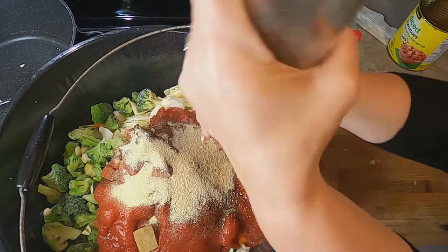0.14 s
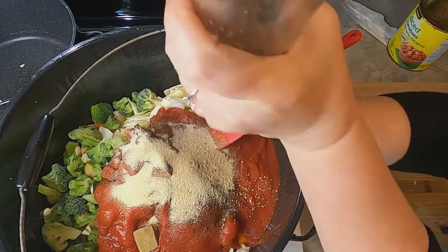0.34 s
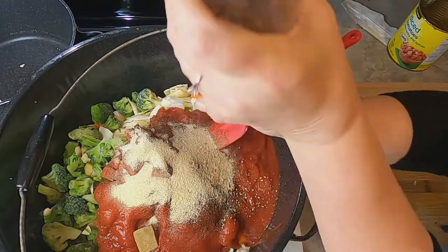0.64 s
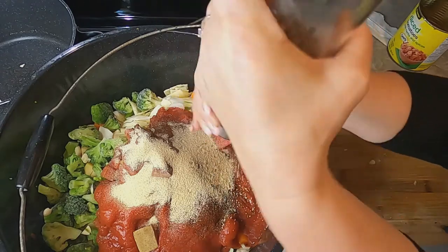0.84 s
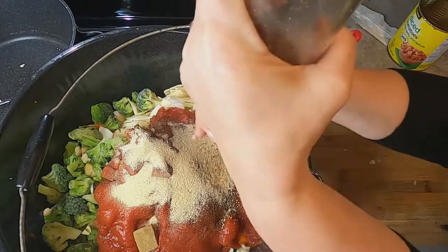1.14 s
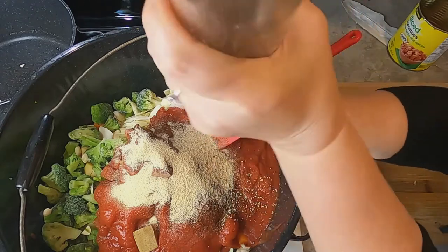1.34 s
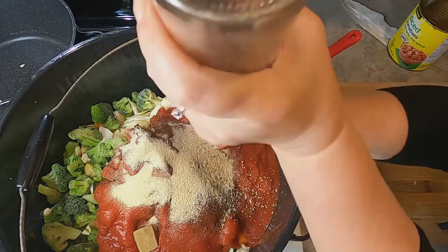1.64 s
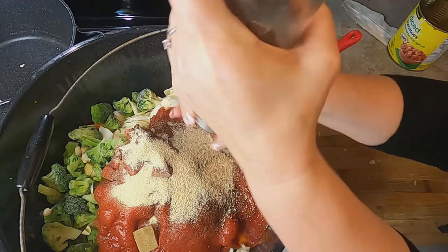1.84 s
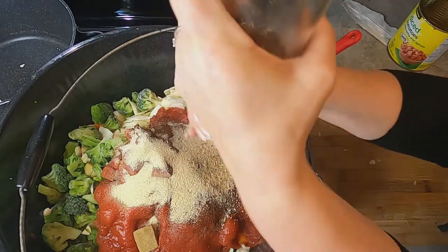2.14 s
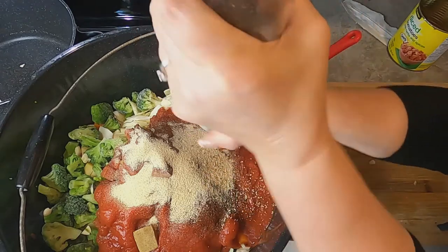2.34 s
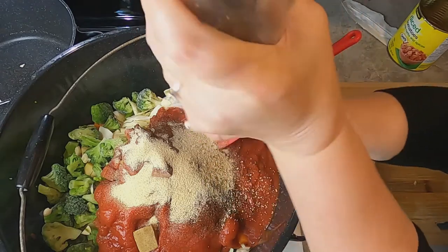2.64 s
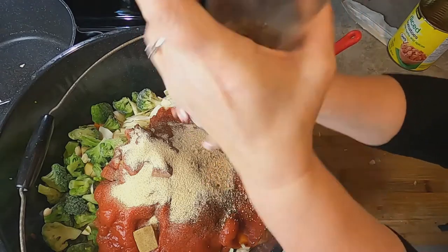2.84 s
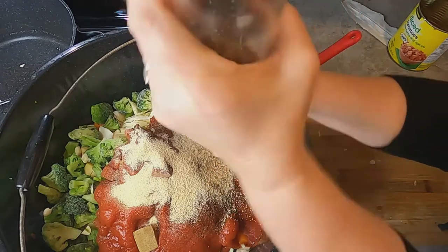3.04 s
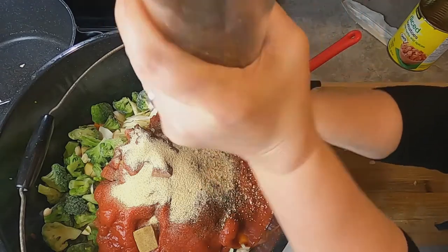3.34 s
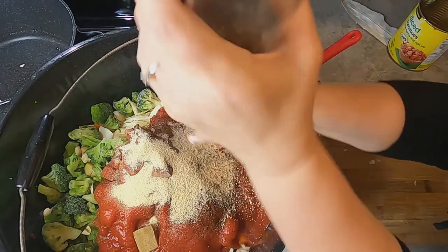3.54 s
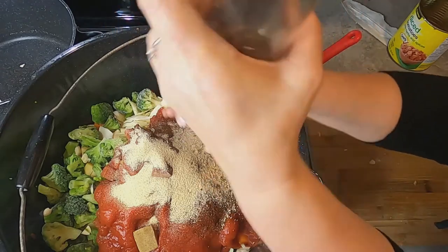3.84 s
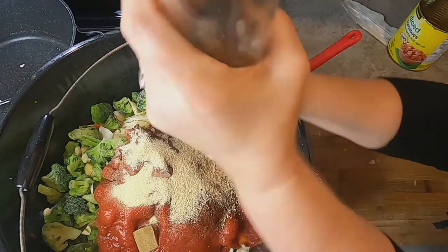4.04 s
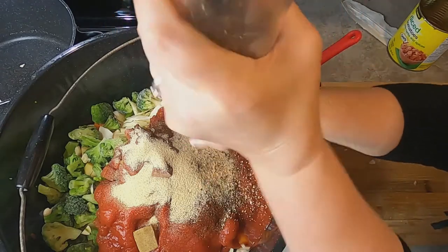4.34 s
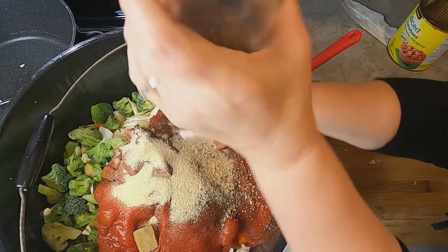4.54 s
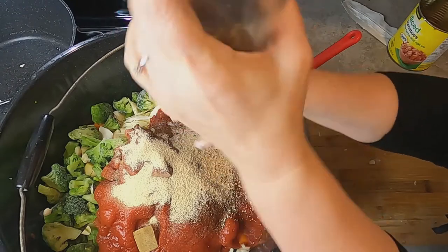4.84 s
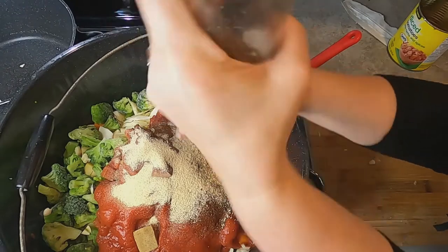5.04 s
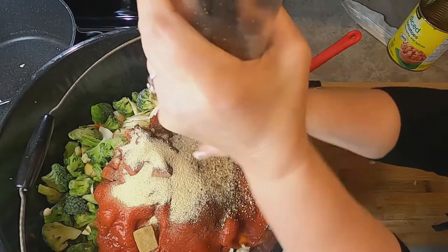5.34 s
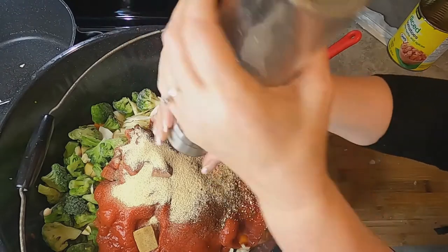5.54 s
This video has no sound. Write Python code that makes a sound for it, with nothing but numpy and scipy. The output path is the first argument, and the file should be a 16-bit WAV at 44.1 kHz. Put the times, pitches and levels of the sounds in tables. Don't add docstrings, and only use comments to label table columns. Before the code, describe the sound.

Close, steady twists of a glass-jarred pepper grinder: gritty crunch, sharp little cracks, then loose corns rattling, over faint kitchen room hiss.

```python
import sys
import numpy as np
from scipy import signal
from scipy.fft import rfft, irfft, next_fast_len
from scipy.io import wavfile

SR = 44100
rng = np.random.default_rng(int(sys.argv[2]) if len(sys.argv) > 2 else 0)


def file_out(sig):
    cols = np.atleast_2d(sig).T
    lim = np.clip(cols, -1, 1)
    pcm = np.round(lim * 32767).astype(np.int16)
    wavfile.write(sys.argv[1], SR, pcm)


def to_linear_factor(level_db):
    exponent = np.asarray(level_db, float) / 20
    return 10 ** exponent


N = 251017
COARSE = np.arange(0, N, 64)
LEFT_RIGHT = np.array([[1], [-1]])


def rms_one(x):
    return x / np.sqrt(np.mean(x ** 2) + 1e-20)


def every_sample(coarse):
    return np.interp(np.arange(N), COARSE, coarse)


def in_time(rows):
    s, *columns = np.transpose(rows)
    return [np.interp(np.arange(N) / SR, s, c) for c in columns]


def at_hz(points, hz):
    table_hz, values = np.transpose(points)
    return np.interp(np.log(hz), np.log(np.maximum(table_hz, 1)), values)


def band_share(hz, low_hz, high_hz):
    return np.clip(np.log(hz / low_hz) / np.log(high_hz / low_hz), 0, 1)


def shaped(x, gain_of_hz):
    size = next_fast_len(N + SR // 2)
    hz = np.arange(size // 2 + 1) * SR / size + 1e-3
    return irfft(rfft(x, size) * gain_of_hz(hz), size)[..., :N]


def resonate(x, hz, width_hz):
    r = np.exp(-np.pi * width_hz / SR)
    b = np.array([1, 0, -1]) * (1 - r * r) / 2
    return signal.lfilter(b, [1, -2 * r * np.cos(2 * np.pi * hz / SR), r * r], x)


def drift(rate_hz):
    r = np.exp(-40 * np.pi * rate_hz / SR)
    noise = rng.standard_normal(N // 20 + 2002)
    slow = signal.lfilter([1], [1, -2 * r, r * r], noise)[2000:]
    return np.interp(np.arange(N) / 20, np.arange(len(slow)), rms_one(slow))


def grains(per_s, spread_db):
    born = rng.random(N) < per_s / SR
    sizes = to_linear_factor(spread_db * np.minimum(rng.exponential(1, N), 4)) * rng.choice([-1, 1], N)
    return rms_one(born * sizes + 1e-18)


def swells(rows, rise_db_per_s, fall_db_per_s, rest_db):
    age = COARSE[None] / SR - np.array(rows)[:, :1]
    db = np.array(rows)[:, 1:] + np.where(age < 0, rise_db_per_s * age, -fall_db_per_s * age)
    return every_sample(10 * np.log10(np.sum(to_linear_factor(2 * db), axis=0) + to_linear_factor(2 * rest_db)))


# f/Hz, level/dB per Hz
AIR_SPECTRUM = [(180, -63), (300, -9.5), (1070, -21), (2070, -14), (2690, -3), (3810, -26.5), (5950, -15.5),
                (12300, -29), (15500, -40)]
AIR_DB = -54.5


def air():
    hiss = shaped(rng.standard_normal((2, N)), lambda hz: to_linear_factor(at_hz(AIR_SPECTRUM, hz)))
    return to_linear_factor(AIR_DB - 6.5) * rms_one(hiss)


# t/s, level/dB
LEANS = [
    (0.0, -59),
    (.87, -68),
    (1.16, -61),
    (1.5, -52.5),
    (1.82, -62),
    (2.46, -65),
    (3.14, -49.5),
]
DRONE_HZ, DRONE_WIDTH_HZ, DRONE_REST_DB = 166, 60, -68.5


def drone():
    mid, side = rng.standard_normal((2, N))
    hum = mid + .6 * side * LEFT_RIGHT
    for _ in range(2):
        hum = resonate(hum, DRONE_HZ, DRONE_WIDTH_HZ)
    return to_linear_factor(swells(LEANS, 184, 148.5, DRONE_REST_DB)) * rms_one(hum)


# t/s, level/dB
ARM_MOVES = [
    (.4, -75),
    (1.1, -69),
    (2.0, -59.5),
    (2.85, -61.5),
    (3.41, -65),
    (3.82, -57),
    (4.63, -61),
    (5.05, -59),
]
ARM_REST_DB = -69.5


def arm_rumble():
    band = signal.butter(3, [14, 45], "band", fs=SR, output="sos")
    mid, side = signal.sosfilt(band, rng.standard_normal((2, N)))
    rumble = rms_one(mid * to_linear_factor(1.4 * LEFT_RIGHT) + 0.45 * side * LEFT_RIGHT)
    return to_linear_factor(swells(ARM_MOVES, 58, 39.5, ARM_REST_DB)) * rumble


KITCHEN_T60_S, KITCHEN_DB, WALL_CUT_HZ = 0.28, -13, 10000


def kitchen(x):
    age = np.arange(SR // 2) / SR
    both, apart = rng.standard_normal((2, len(age)))
    apart = signal.lfilter(*signal.butter(1, 1200, "high", fs=SR), apart)
    onset = np.minimum(age / .003, 1)
    decay = to_linear_factor(-60 * age / KITCHEN_T60_S) * onset * (1 + 0.53 * np.exp(-age / 0.0059))
    tails = np.array([both + apart, both - apart]) * decay
    tails = signal.lfilter(*signal.butter(1, WALL_CUT_HZ, fs=SR), tails)
    tails = tails / np.sqrt(np.mean(np.sum(tails ** 2, axis=1)))
    return to_linear_factor(KITCHEN_DB) * signal.fftconvolve(x[None], tails, axes=1)[:, :N]


# t/s, peak/dB
THUDS = [
    (0.87, -57),
    (1.46, -56),
    (2.821, -65),
    (3.097, -62),
    (4.141, -67),
]
THUD_HZ, THUD_WIDTH_HZ = 84, 25


def thuds():
    push = np.full(N, 1e-18)
    for s, peak_db in THUDS:
        push[round(s * SR)] = to_linear_factor(peak_db + 56.5)
    return resonate(resonate(push, THUD_HZ, THUD_WIDTH_HZ), THUD_HZ, 8.4 * THUD_WIDTH_HZ)


STILL_DB, STILL_LEAD_MS, STILL_MS = -4.5, 18, 20


def stillness():
    gaps = (COARSE / SR - np.array(TWISTS)[:, :1] + STILL_LEAD_MS / 1000) / (STILL_MS / 1000)
    return every_sample(STILL_DB * np.exp(-gaps ** 2).sum(axis=0))


# t/s, level/dB, f/Hz
RATTLE = [(0.0, -45, 2630), (0.16, -52.5, 2660), (0.33, -48, 2550), (0.58, -55.5, 2600),
          (0.92, -48.5, 2710), (1.08, -56, 2440), (1.5, -59.5, 2760), (1.75, -48, 2680),
          (1.93, -49.5, 2620), (2.15, -63, 2670), (2.97, -53.5, 2670), (3.27, -55.5, 2600),
          (3.82, -59.5, 2720), (4.25, -54.5, 2730), (4.75, -47, 2640), (5.26, -52, 2680), (5.52, -60, 2600),
          (5.6, -91, 2920)]
UPPER_DB, UPPER_FOLLOWS, UPPER_DAMPED = -57.5, 0.37, 0.059
WAVER_HZ = 46


def jar_shaking(crush_db):
    shake_db, ring_hz = in_time(RATTLE)
    still_db = stillness()
    ring_hz = ring_hz + WAVER_HZ * drift(5.2)
    upper_db = UPPER_DB + UPPER_FOLLOWS * (shake_db - shake_db.mean())
    upper_db = upper_db - UPPER_DAMPED * (crush_db - crush_db.mean())
    return shake_db + still_db, ring_hz, upper_db + still_db


# f/Hz, width/Hz, level/dB
JAR_RINGS = [(5310, 400, -12), (5910, 180, -11), (6990, 330, -18.5), (9250, 420, -24.5), (12100, 970, -29)]
JAR_MAIN_HZ = [2400, 2520, 2640, 2760, 2880]
JAR_MAIN_WIDTH_HZ = 105


def jar(main_db, main_hz, upper_db):
    taps = grains(1400 * to_linear_factor(4.0 * drift(25)), spread_db=3.0)
    upper = np.zeros((2, N))
    for hz, width_hz, db in JAR_RINGS:
        strikes = taps * rng.standard_normal((2, N))
        upper += to_linear_factor(db + 3.9 * drift(8.1)) * resonate(strikes, hz, width_hz)
    upper = upper[0] + .5 * upper[1] * LEFT_RIGHT
    main = np.zeros(N)
    for hz in JAR_MAIN_HZ:
        nearness = np.exp(-((main_hz - hz) / 130) ** 2)
        main += resonate(taps * rng.standard_normal(N) * nearness, hz, JAR_MAIN_WIDTH_HZ)
    main_gain = to_linear_factor(main_db - 2.0 + 2.1 * drift(8.9))
    return main_gain * rms_one(main) + to_linear_factor(upper_db + 0.5) * rms_one(upper)


# t/s, length/ms, level/dB
DRAGS = [(1.456, 34, -46.5), (2.084, 49, -54), (2.415, 48, -58.5), (2.758, 38, -46.5), (3.435, 44, -53.5),
         (3.76, 20, -47), (4.086, 55, -58), (4.436, 21, -54), (4.737, 60, -54), (5.056, 47, -60),
         (5.42, 28, -55)]
# f/Hz, width/Hz, level/dB
HOLLOW_RINGS = [(1072, 109, 0), (1497, 23, -4.5)]
DRAG_ONSET_DB_PER_S, RELEASE_DB_PER_S = 3000, 368


def scrape():
    s, length_ms, db = np.transpose(DRAGS)[:, :, None]
    age = COARSE / SR - s
    drag_db = db + DRAG_ONSET_DB_PER_S * np.minimum(age, 0)
    drag_db = drag_db - RELEASE_DB_PER_S * np.maximum(age - length_ms / 1000, 0)
    slips = grains(900, spread_db=4.0)
    rings = sum(to_linear_factor(ring_db) * resonate(slips, hz, 1.2 * width_hz) for hz, width_hz, ring_db in HOLLOW_RINGS)
    return every_sample(to_linear_factor(drag_db).sum(axis=0)) * rms_one(rings)


# t/s, peak/dB, lows/dB, highs/dB, length/ms
CRACKS = [(0.176, -21, -3, -15, 1.66), (0.1899, -19.5, -10, -10.5, 2.2), (0.5171, -18.5, -8.5, -8.5, 1.9),
          (0.86, -14, -9.5, -11.5, 2.9), (1.147, -11.5, -3.5, -7, 1.77), (1.1696, -16.5, -5, -16, 2.3),
          (1.552, -16, 1, -12, 1.3), (1.8427, -16, -5.5, -33, 3.7), (1.8784, -10.5, -14.5, -14.5, 2),
          (2.1334, -14.5, -8.5, -12.5, 1.44), (2.1636, -21.5, -6.5, -13, 3.7),
          (2.188, -19.5, -10, -36, 2.5), (2.4755, -21.5, -4, -5, 6.8), (2.501, -19, -21, -20, 2.2),
          (2.804, -16.5, -11, -14.5, 3.7), (3.1193, -14.5, -5, -4.5, 1.5), (3.1432, -14.5, -5, -15, 0.96),
          (3.477, -20, -3, -9.5, 1.5), (3.7889, -7.5, -9, -8, 0.82), (4.144, -12, -8, -4.5, 0.82),
          (4.4569, -11.5, -20.5, -22, 0.97), (4.4848, -17, -32, -47, 2.6), (4.818, -16.5, -30, -46, 1.6),
          (4.8278, -16, -25, -20.5, 1.86)]
# t/s, peak/dB, highs/dB
CATCHES = [(0.4767, -28.5, -3.5), (0.6456, -35.5, -30), (0.8231, -28.5, -2.5), (0.8967, -23.5, -30),
           (0.976, -30.5, -16), (1.1274, -38, -11), (1.279, -54, 5), (1.389, -58, 0), (1.4573, -45, -3),
           (1.477, -32.5, -19), (1.491, -23.5, -33), (1.7967, -25.5, -4), (2.116, -38, -30),
           (2.444, -32.5, -24), (2.7612, -40.5, -6), (3.0294, -37, -20), (3.105, -30.5, -2),
           (3.4454, -41, -13), (3.4587, -36.5, -28), (3.7101, -38, -26), (3.7629, -40, -16),
           (4.131, -27.5, -18), (4.7553, -36.5, -9), (5.0548, -49, -22), (5.126, -34, -11),
           (5.191, -30.5, -15), (5.3193, -43, -22), (5.443, -38.5, -19), (5.467, -33, -23),
           (5.6199, -48, -5)]
CATCH_LOWS_DB, CATCH_MS = 2.5, 1.25
# t/s, peak/dB, highs/dB
TICKS = [(0.2813, -33, -9), (0.2977, -34.5, -10), (0.6355, -46, 6), (0.672, -40.5, -3),
         (0.7037, -38.5, -26), (0.845, -18.5, -27), (1.0274, -53, -14), (1.331, -58, 17),
         (1.51, -17.5, -19), (1.6903, -31, -33), (2.0155, -33, -11), (2.332, -45, -13), (2.4677, -25, -29),
         (2.6624, -35, -10), (2.7806, -28, -21), (2.9084, -42, 3.5), (3.342, -31.5, -19), (3.855, -21, -25),
         (4.038, -37.5, -5), (4.1061, -24.5, -23), (4.346, -34, -10), (4.4368, -35, -24.5),
         (4.6, -33.5, -3), (4.675, -30, -21), (4.93, -44, -1), (5.044, -49, 14), (5.1044, -31.5, -22),
         (5.2728, -38, 4), (5.334, -30, -10.5), (5.524, -22.5, -39.5)]
TICK_LOWS_DB, TICK_MS = -18.5, 1.42
SHARDS_DB, SHARDS_MS = -17.5, 16


def crack_bursts():
    burst, lows_db, highs_db = np.zeros((3, N))
    age = np.arange(round(.03 * SR)) / SR
    blows = list(CRACKS)
    blows += [(s, db, CATCH_LOWS_DB, high, CATCH_MS) for s, db, high in CATCHES]
    blows += [(s, db, TICK_LOWS_DB, high, TICK_MS) for s, db, high in TICKS]
    shards = to_linear_factor(SHARDS_DB) * np.exp(-age * 1000 / SHARDS_MS)
    for s, peak_db, low_db, high_db, length_ms in blows:
        at = round(s * SR) + np.arange(len(age))
        split = np.exp(-age / np.clip(length_ms / 1000, 2e-4, .008))
        shape = to_linear_factor(peak_db) * np.minimum(age / 0.00043, 1) * (split + shards)
        louder = shape > burst[at]
        burst[at[louder]] = shape[louder]
        lows_db[at[louder]], highs_db[at[louder]] = low_db, high_db
    return burst, lows_db, highs_db


def knocks(burst, lows_db, highs_db):
    shake = burst * rng.standard_normal(N) + 1e-18
    jolt = np.maximum(np.diff(burst, prepend=0), 0)
    drive = (jolt * to_linear_factor(11.5) + shake) * to_linear_factor(lows_db)
    body = sum(to_linear_factor(db) * resonate(drive, hz, width_hz) for hz, width_hz, db in HOLLOW_RINGS)
    glass = sum(to_linear_factor(db) * resonate(shake * to_linear_factor(highs_db), hz, width_hz) for hz, width_hz, db in JAR_RINGS)
    main = sum(resonate(shake, hz, JAR_MAIN_WIDTH_HZ) for hz in JAR_MAIN_HZ[1::2])
    return to_linear_factor(20.0) * body + to_linear_factor(16) * glass + to_linear_factor(5.0) * main


# bite t/s, rise/ms, hold/ms, crush/dB, highs against lows/dB
TWISTS = [(-.17, 39, 38, -28, -8), (0.159, 50.7, 30, -33.5, -1), (0.476, 29, 50, -32, -6.5),
          (0.81, 46.3, 27.4, -23.5, -11.5), (1.13, 35, 58.6, -30, -7.5), (1.452, 45, 61, -27.5, -13.5),
          (1.778, 41, 53, -33, -2.5), (2.099, 31.3, 70, -36.5, -2), (2.427, 56, 29, -31.5, -4.5),
          (2.758, 38.4, 60.4, -31, -7), (3.093, 34.6, 43.4, -28.5, -4), (3.438, 45.5, 22.4, -30.5, -3.5),
          (3.754, 59, 52, -36, -1.5), (4.092, 57, 21, -33, -1), (4.432, 38, 62, -34.5, -6),
          (4.737, 81.4, 18, -33.5, -7), (5.082, 58, 42, -33.5, -3.5), (5.412, 50, 60, -37.5, -7.5)]
BITE_DB, SAG_DB_PER_S = -58, 31
SETTLE_DB, SETTLE_DB_PER_S, SETTLE_HIGHS_DB = -22, 86, -0.5
REST_DB = -74
HIGHS_CLIMB = 0.87
HIGHS_CLIMB_NOTE = None


def twisting():
    t = COARSE / SR
    s, rise_ms, hold_ms, db, highs_db = np.transpose(TWISTS)[:, :, None]
    full = s + rise_ms / 1000
    held = np.maximum(t - full, 0)
    released = np.maximum(t - full - hold_ms / 1000, 0)
    rising = (db - BITE_DB) * np.minimum(t - full, 0) / (full - s)
    crush = db + rising - SAG_DB_PER_S * held - RELEASE_DB_PER_S * released
    settle = db + rising + SETTLE_DB - SETTLE_DB_PER_S * released
    lows = np.sum(to_linear_factor(2 * crush) + to_linear_factor(2 * settle), axis=0) + to_linear_factor(2 * REST_DB)
    bright = to_linear_factor(2 * (crush + highs_db)) + to_linear_factor(2 * (settle + SETTLE_HIGHS_DB))
    highs = np.sum(to_linear_factor(2 * (HIGHS_CLIMB - 1) * rising) * bright, axis=0) + to_linear_factor(2 * (REST_DB + 10.5))
    return [every_sample(10 * np.log10(power)) for power in (lows, highs)]


# f/Hz, level/dB per Hz
BODY = [(71, -52), (120, -27.5), (184, -15), (312, -22.5), (598, -10.5), (662, -16), (899, -2.5),
        (1320, 0.5), (2160, -5.5), (2640, -4.5), (4960, -17), (6210, -28), (9130, -30.5), (14000, -73),
        (15500, -107)]
# f/Hz, share
SPREAD = [(500, 0.18), (1500, 0.034), (4000, 0.17), (12000, 0.69)]
HOLLOW_HZ, HOLLOW_WIDTH_HZ, HOLLOW_DB = 2330, 130, -7


def mill(low_db, high_db, burst, crack_low_db, crack_high_db):
    shared = grains(2200 * to_linear_factor(3.0 * drift(36)), spread_db=3.0)
    lumps = to_linear_factor(4.5 * np.tanh(drift(110)))
    own, ends = rng.standard_normal((2, 3, N))
    blow = 3.3 * (np.diff(burst, 2, append=[0, 0]) < -.02 * burst)
    out = np.zeros((2, N))
    for k, hz in enumerate(np.geomspace(130, 15000, 30)):
        up = band_share(hz, 1014, 6260)
        grit_db = (1 - up) * low_db + up * (high_db + 11.5) + 1.9 * band_share(hz, 12000, 20000)
        grit = to_linear_factor(grit_db) * lumps * to_linear_factor(3.03 * drift(73))
        crack_db = (1 - band_share(hz, 1890, 2470)) * (crack_low_db + 0.5)
        crack_db = crack_db - 8 * (1 - band_share(hz, 290, 1000))
        crack_db = crack_db + band_share(hz, 3520, 4060) * (8.0 + 0.29 * crack_high_db)
        crack_db = crack_db + band_share(hz, 4800, 5360) * (0.7 * crack_high_db + 9)
        crack_db = crack_db - 4.6 * band_share(hz, 8800, 16000) + 1.5
        crack = burst * to_linear_factor(crack_db)
        mid = grit * (0.38 * shared + 0.58 * own[k % 3]) + crack * (own[(k + 1) % 3] + blow)
        side = (grit + crack) * ends[k % 3] * at_hz(SPREAD, hz)
        band = signal.butter(2, hz * 2 ** (np.array([-1, 1]) * .13), "band", fs=SR, output="sos")
        out += to_linear_factor(at_hz(BODY, hz)) * signal.sosfilt(band, [mid, side])
    notch = lambda hz: to_linear_factor(HOLLOW_DB * np.exp(-((hz - HOLLOW_HZ) / HOLLOW_WIDTH_HZ) ** 2))
    mid, side = to_linear_factor(13.0) * shaped(out, notch)
    return np.array([mid + side, mid - side])


# f/Hz, left minus right/dB
PORTS = [(150, 0), (500, .6), (1000, 1.8), (2500, 2.8), (4500, 2), (7000, -2), (12000, -4.5)]
# f/Hz, left lag/rad
PORT_LAG = [(300, .3), (1000, .4), (3300, 1.0), (6500, 1.3), (15000, 1.4)]


def ports(x):
    lag = lambda hz: np.exp(-1j * at_hz(PORT_LAG, hz) * (hz > 1))
    left = shaped(x[0], lambda hz: to_linear_factor(at_hz(PORTS, hz) / 2) * lag(hz))
    right = shaped(x[1], lambda hz: to_linear_factor(-at_hz(PORTS, hz) / 2))
    return np.array([left, right])


def scene():
    cracks = crack_bursts()
    lows_db, highs_db = twisting()
    near = scrape() + jar(*jar_shaking(lows_db)) + knocks(*cracks) + mill(lows_db, highs_db, *cracks)
    background = air() + drone() + arm_rumble()
    return background + kitchen(near.mean(axis=0)) + thuds() + ports(near)


def low_pass(x):
    return signal.sosfilt(signal.butter(12, 15750, fs=SR, output="sos"), x)


def record(dry):
    top_cut = signal.cheby2(10, 60, 16300, fs=SR, output="sos")
    mix = signal.sosfilt(top_cut, dry)
    return low_pass(mix)


dry = scene()
out = record(dry)
file_out(out)
```